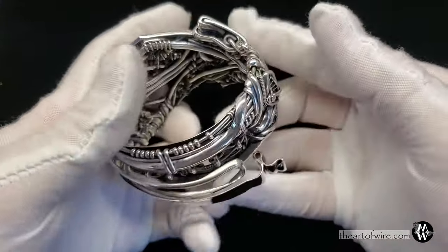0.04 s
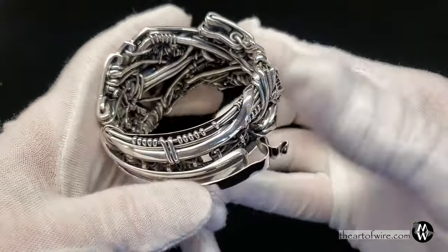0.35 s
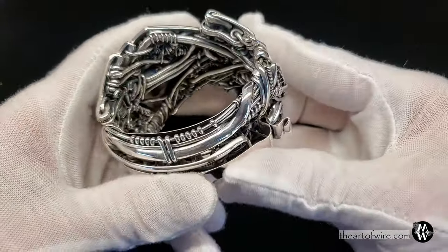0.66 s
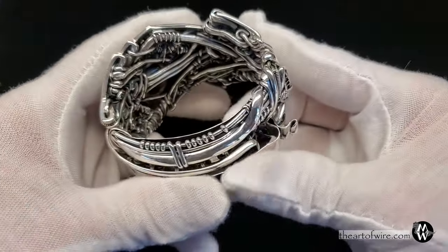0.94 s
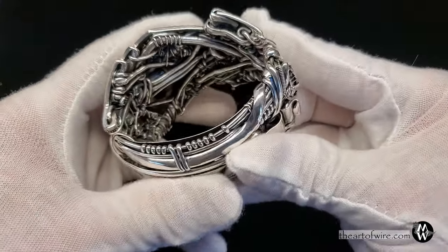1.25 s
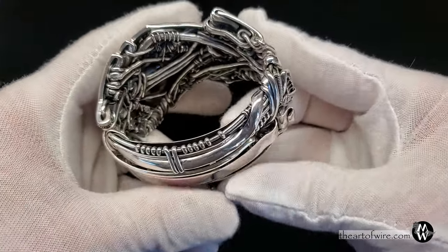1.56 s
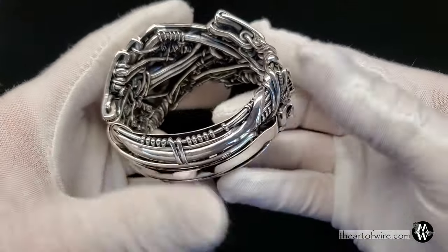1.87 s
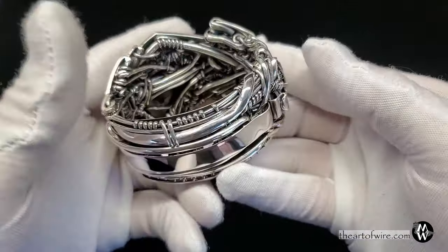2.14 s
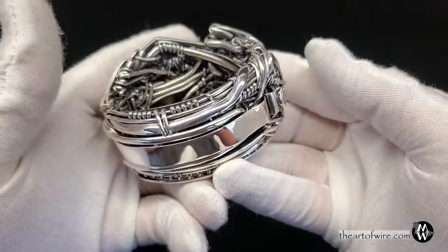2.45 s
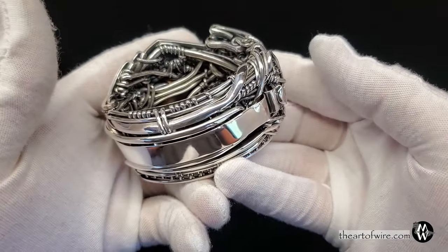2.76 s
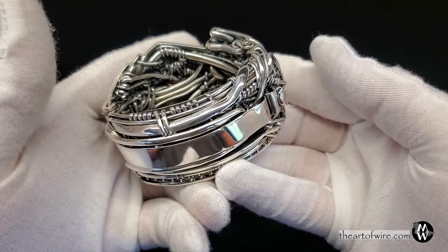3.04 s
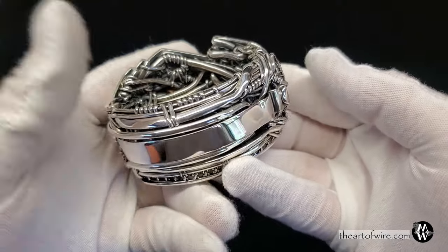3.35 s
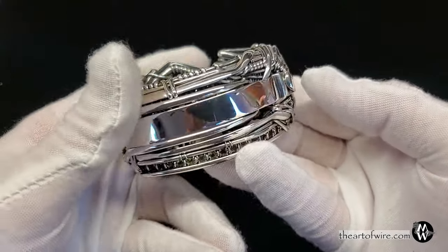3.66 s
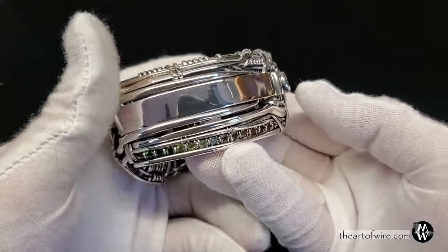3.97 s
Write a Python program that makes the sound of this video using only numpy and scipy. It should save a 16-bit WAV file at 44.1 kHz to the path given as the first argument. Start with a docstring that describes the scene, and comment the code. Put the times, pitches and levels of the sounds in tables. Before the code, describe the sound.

One bright click of a metal clasp closing, with a low throbbing hum behind it.

```python
"""Gloved hands close a heavy silver bracelet near the microphones in a small, quiet room.
From the start a motor hums, beating against the mains, over low rumble and a thin hiss.
Cotton rubs faintly on the metal and the hinge ticks three times. Near 1.2 s the catch touches and,
after a brief rush of noise, snaps shut: a very short, bright ring of metal and a quick room tail.
The gloves brush the bracelet a few more times while the hum carries on."""
import sys
import numpy as np
from scipy import signal
from scipy.fft import rfft, irfft
from scipy.io import wavfile
from scipy.ndimage import uniform_filter1d

SR = 44100
rng = np.random.default_rng(int(sys.argv[2]) if len(sys.argv) > 2 else 0)


def bounce(signal):
    """Save signal as a 16-bit WAV file at the path given by the first command-line argument."""
    frames = np.transpose(np.atleast_2d(signal))
    limited = np.clip(frames, -1, 1)
    pcm = np.round(limited * 32767).astype(np.int16)
    wavfile.write(sys.argv[1], SR, pcm)


N = 176400
TIME = np.arange(N) / SR
BIN_HZ = np.fft.rfftfreq(N, 1 / SR)
MOTOR_HZ, MAINS_HZ = 53.08, 60.01

# the catch's light touch, then its snap: t/s, gain/dB
CATCH_HITS = [(1.1728, -27), (1.1856, 2)]


def from_db(db):
    """Decibels to gain."""
    return 10 ** (np.asarray(db) / 20)


def pan(db):
    """Stereo gains that put the left side db above the right."""
    return from_db(np.array([[db], [-db]]) / 2)


def per_bin(points):
    """A curve over log frequency, read at every Fourier bin."""
    hz, value = np.transpose(points)
    return np.interp(np.log(BIN_HZ + 1), np.log(hz), value)


def noise(colour):
    """Noise of rms 1, shaped by an EQ curve."""
    x = irfft(rfft(rng.standard_normal(N)) * from_db(per_bin(colour)), N)
    return x / x.std()


def wide_noise(colour):
    """Unrelated noise in each channel."""
    return np.array([noise(colour), noise(colour)])


def attack(seconds):
    """A fade-in with the given time constant."""
    return 1 - np.exp(-TIME / seconds)


def decay(t60):
    """An envelope that loses 60 dB in t60 seconds."""
    return np.exp(-np.log(1000) * np.minimum(TIME / t60, 10))


def ring(hz, db, t60):
    """One struck mode: a dying sine."""
    return from_db(db) * np.sin(2 * np.pi * hz * TIME) * decay(t60)


def play(cues, sound):
    """Trigger a sound at every cue: t/s, gain/dB."""
    out = np.zeros_like(sound)
    for start_s, db in cues:
        i = max(int(round(start_s * SR)), 0)
        out[..., i:] += from_db(db) * sound[..., :N - i]
    return out


def clasp():
    """The catch strikes the hand-damped bracelet; wires, nearby surfaces and the room answer."""
    # the bracelet's bright, choked ring: f/Hz, level/dB, t60/s, left over right/dB
    bracelet_modes = [(880, -46.5, .01, 6.5), (1200, -44, 0.012, 8), (1720, -40, .012, -3),
                      (2760, -38.5, .012, 5), (4590, -30, .006, 11.5), (5040, -27.5, .009, 8.5),
                      (6300, -32, .009, 3), (6830, -29.5, 0.0072, 6.5), (8470, -21.5, .003, 2),
                      (10000, -25.5, 0.0049, 8), (10950, -21.5, .004, 3.5), (12290, -13.5, .005, 10.5),
                      (13200, -13, .005, 3), (14506, -18.5, 0.0037, -6.5)]
    # the tongue chatters as it seats: delay/s, gain/dB
    chatter = [(0, 0.5), (.00032, -10.5), (.0011, -14.5), (.0021, -22.5)]
    # the wirework shimmers on faintly: f/Hz, level/dB, t60/s
    wire_modes = [(5365, -64, .28), (5588, -56.5, .13), (5948, -60.5, 0.25), (6368, -64, .17),
                  (11800, -58.5, .15), (12420, -61, .18), (12500, -50.5, .1), (14290, -59, .14),
                  (14920, -57, .12)]
    # the soft knock of the hand-held body: f/Hz, level/dB, t60/s
    knock_modes = [(182, -52.5, .06), (392, -51, 0.045)]
    # the splash of sound scattered by hands and table: f/Hz, level/dB
    scatter_eq = [(100, -12), (330, -5), (550, -17), (1200, -23), (2600, -15), (3500, -15.5), (4300, -9),
                  (5500, -1.5), (7000, 3), (9000, -3), (13000, 6.5), (16000, -7)]
    # early reflections off the nearest surfaces: delay/s, gain/dB
    reflections = [(.0099, -31), (.0165, -31.5), (.0205, -32.5)]
    left_lag_s = .000136
    left, right = sum((-1) ** k * pan(side_db) * ring(hz, db, t60)  # modes alternate in polarity
                      for k, (hz, db, t60, side_db) in enumerate(bracelet_modes))
    late_left = play([(left_lag_s, 0)], left)
    metal = play(chatter, np.array([late_left, right]))
    echoes = play(reflections, metal[::-1])  # left and right swapped
    wires = sum(ring(*mode) for mode in wire_modes)
    knock = sum(ring(*mode) for mode in knock_modes)
    scatter = from_db(-21) * wide_noise(scatter_eq) * attack(.0006) * decay(t60=.019)
    return play(CATCH_HITS, metal + echoes + wires + knock + scatter + room_tail())


def rush_before_snap():
    """A brief, low-weighted rush of noise between the touch and the snap, with a faint high edge."""
    # the tone of the rush: f/Hz, level/dB
    rush_eq = [(200, 6.5), (700, 7), (2000, -1), (3500, -10), (6000, 0), (9000, -7), (13000, -0.5),
               (16000, -3)]
    (touch_s, _), (snap_s, _) = CATCH_HITS
    gate = (TIME > touch_s) & (TIME < snap_s)
    return from_db(-54) * gate * wide_noise(rush_eq)


def hinge():
    """Light contacts tick in the hinge while the band swings closed."""
    # the hinge's contacts: t/s, gain/dB
    tick_cues = [(.2698, -45.5), (.6494, -41), (.7302, -47.5)]
    # the tone of one tick: f/Hz, level/dB
    tick_eq = [(500, -7), (1600, -2), (2100, 2), (2900, -10), (4400, 2), (5800, -6), (8300, -3), (9500, -9),
               (11000, -7), (16000, -1)]
    tick = from_db(-15.5) * pan(4) * wide_noise(tick_eq) * decay(t60=.019)
    return play(tick_cues, tick + from_db(12) * room_tail())


def gloves():
    """Each stroke of cotton on metal swells and fades, grainy from the weave."""
    # glove strokes: peak t/s, length/s, swish level/dB, sheen level/dB
    rubs = [(.1, 0.25, -76.5, -75.5), (.29, .08, -79, -90), (1.49, .26, -74.5, -82),
            (1.86, 0.74, -80, -82.5), (3.58, .3, -92, -84)]
    # the swish of the cloth: f/Hz, level/dB
    swish_eq = [(250, -3), (450, 4), (1000, -19), (2200, -13.5), (5150, -16.5), (5450, 1), (6300, -1.5),
                (7400, -18), (16000, -31)]
    # the fibres' fine, airy sheen: f/Hz, level/dB
    sheen_eq = [(1000, -11), (6000, -5.5), (9500, -4), (11500, 0), (14000, -1), (16000, -2)]
    swish, sheen = wide_noise(swish_eq), wide_noise(sheen_eq)
    strokes = np.zeros((2, N))
    for peak_s, length_s, swish_db, sheen_db in rubs:
        swell = np.cos(np.pi * np.clip((TIME - peak_s) / length_s, -.5, .5))
        strokes += (from_db(swish_db) * swish + from_db(sheen_db) * sheen) * swell
    weave = uniform_filter1d(rng.standard_normal(N), size=300)
    grain_db = 1.5 * weave / weave.std()
    return strokes * from_db(grain_db) * pan(8)


def room_tail():
    """Diffuse reflections build up and die, the treble a little sooner."""
    # the tone of the small room's reverb: f/Hz, level/dB
    reverb_eq = [(100, 1), (280, 4), (500, -8), (1200, -12.5), (2100, -8.5), (3200, -17), (4300, -11),
                 (5500, -0.5), (7000, -1), (8300, -8.5), (10500, -3), (12500, 2.5), (15500, 0.5)]
    crossover_hz = 8950
    wash = wide_noise(reverb_eq)
    lows = irfft(rfft(wash) / (1 + (BIN_HZ / crossover_hz) ** 10), N)
    tail = lows * decay(t60=.235) + (wash - lows) * decay(t60=.21)
    return from_db(-38) * pan(2) * tail * attack(.004)


def motor():
    """The shaft turns a little under the mains rate, so the hum throbs seven times a second."""
    # motor, mains, two tones where they mix, five mains harmonics, two faint motor whines: f/Hz
    hum_hz = [MOTOR_HZ, MAINS_HZ, 2 * MAINS_HZ - MOTOR_HZ, 2 * MAINS_HZ + MOTOR_HZ, 2 * MAINS_HZ, 3 *
              MAINS_HZ, 4 * MAINS_HZ, 6 * MAINS_HZ, 8 * MAINS_HZ, 6 * MOTOR_HZ, 428]
    # the strength of each of those tones: rms level/dB
    hum_db = [-37, -52.5, -63.5, -70, -51, -69, -66.5, -88.5, -90.5, -76.5, -86]
    swell_s = 3.2879  # all tones line up in phase here
    hum = np.zeros((2, N))
    for hz, db in zip(hum_hz, hum_db):
        tone = -np.sqrt(2) * np.cos(2 * np.pi * hz * (TIME - swell_s))
        hum += from_db(db) * pan(1.4 if hz > 100 else 0) * tone  # overtones lean left
    return hum


def room_rumble():
    """A low bed of room tone, centred in the deep bass and wider above."""
    # the tone of the rumble: f/Hz, level/dB
    rumble_eq = [(20, -6.5), (38, 2), (47, 5), (62, 1.5), (80, 0), (110, -2), (135, -1), (170, -4.5),
                 (205, -11), (270, -8.5), (340, -14), (430, -22.5), (600, -30), (850, -26.5), (1100, -34),
                 (1400, -34.5), (3000, -48.5)]
    # how alike the two sides are: f/Hz, correlation
    correlation = [(40, 0.94), (80, 1), (130, .55), (200, .4), (290, 0.49), (640, 0.097), (1400, 0.069)]
    alike = np.clip(per_bin(correlation), -1, 1)
    mid, side = rfft(wide_noise(rumble_eq))
    mid *= np.sqrt((1 + alike) / 2)
    side *= np.sqrt((1 - alike) / 2)
    return from_db(-59) * pan(.6) * irfft(np.array([mid + side, mid - side]), N)


def microphone_hiss():
    """Each microphone adds its own thin hiss, the left one louder."""
    # the tone of the hiss: f/Hz, left level/dB, right level/dB
    hiss_eq = [(500, -3.5, -1), (2022, 0, 0.5), (4000, -0.5, 1), (5100, -0.5, -6.5), (6090, 2, 4),
               (6100, 10, -8), (6550, 14.5, -1), (6930, 9, 1), (7140, -3.5, -3), (7570, -4, -12.5),
               (8095, 1, 1), (8720, 2, -10.5), (9380, -4.5, -5.5), (11300, -.5, -2), (15500, 0, -1.5)]
    left = from_db(-71) * noise([(hz, db) for hz, db, _ in hiss_eq])
    right = from_db(-75.5) * noise([(hz, db) for hz, _, db in hiss_eq])
    return np.array([left, right])


def scene():
    """Bracelet and gloves up close, over a bed of hum, rumble and hiss."""
    return (clasp() + hinge() + gloves() + motor()
            + room_rumble() + microphone_hiss() + rush_before_snap())


def record(dry):
    """A steep low-pass takes off the very top."""
    cutoff_hz = 15800
    return signal.sosfilt(signal.ellip(10, .2, 80, cutoff_hz, fs=SR, output="sos"), dry)


dry = scene()
out = record(dry)
bounce(out)
```